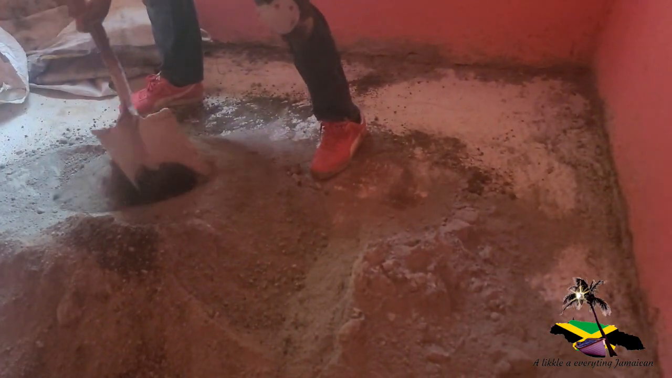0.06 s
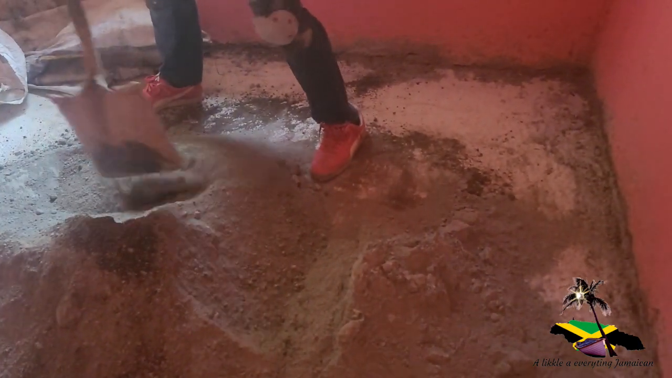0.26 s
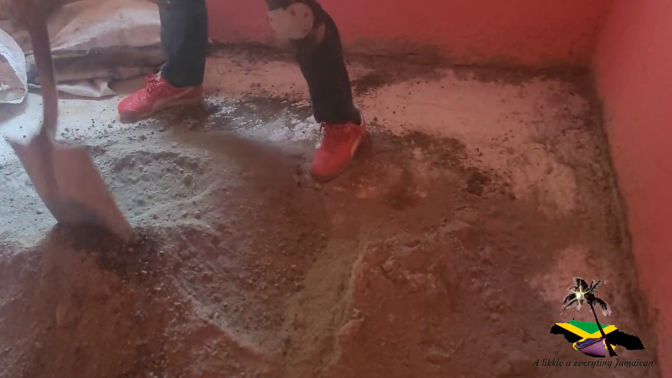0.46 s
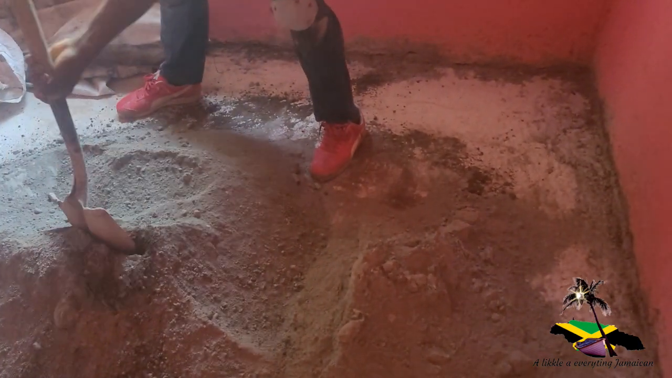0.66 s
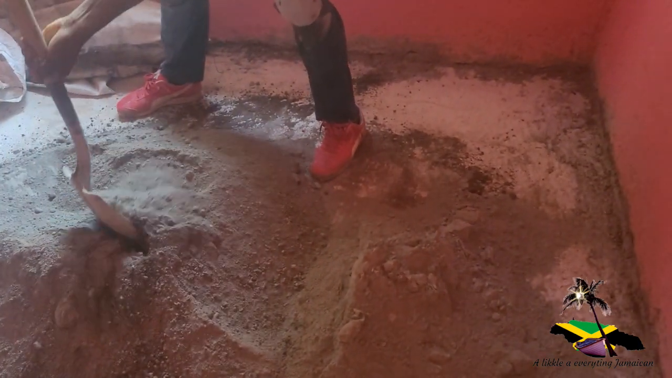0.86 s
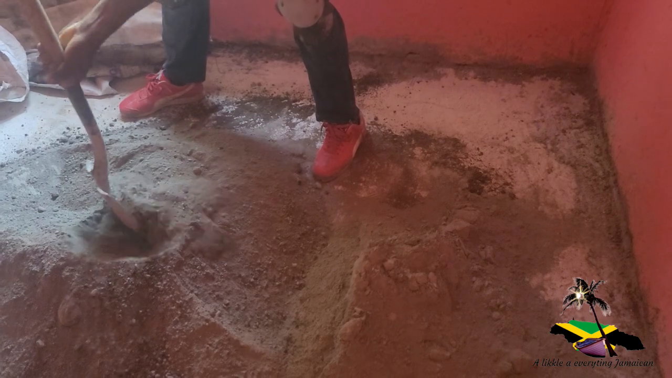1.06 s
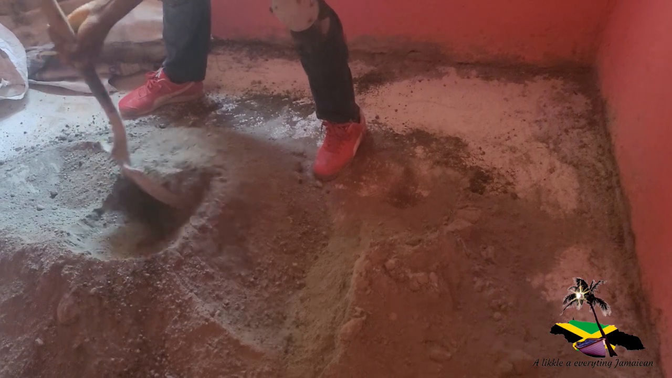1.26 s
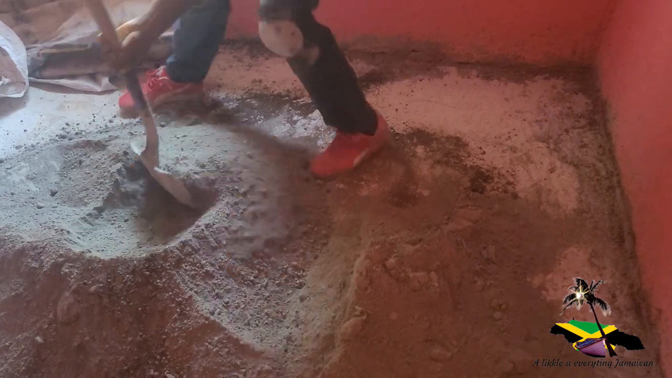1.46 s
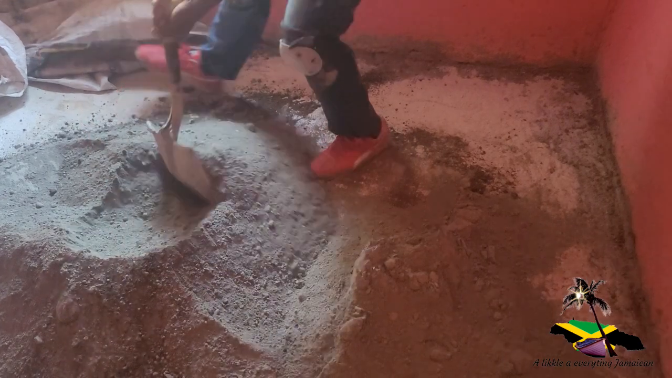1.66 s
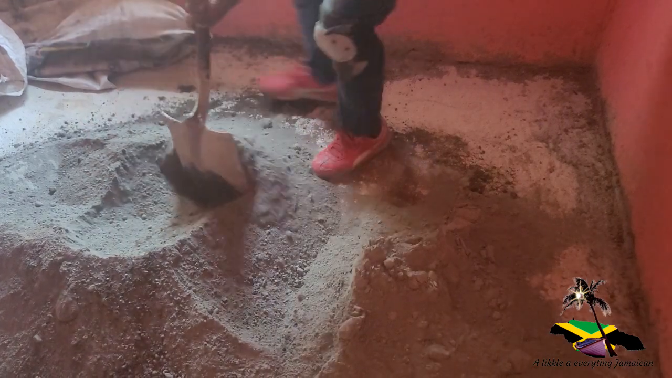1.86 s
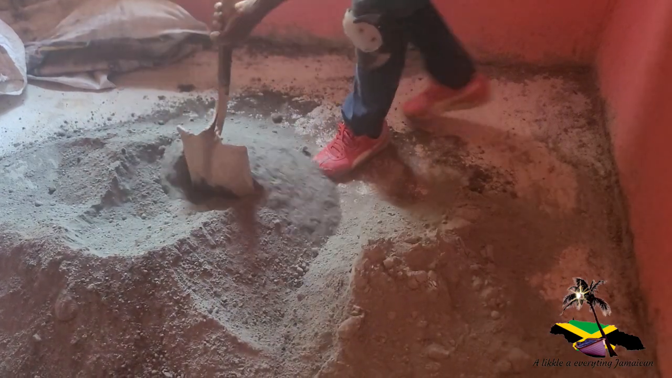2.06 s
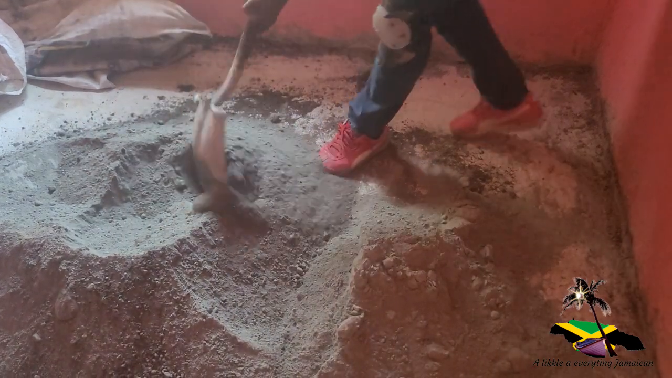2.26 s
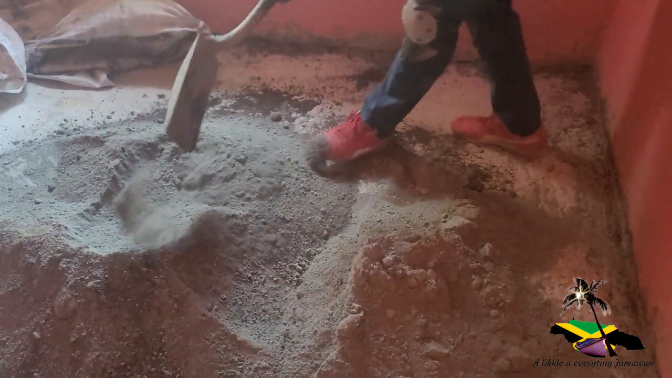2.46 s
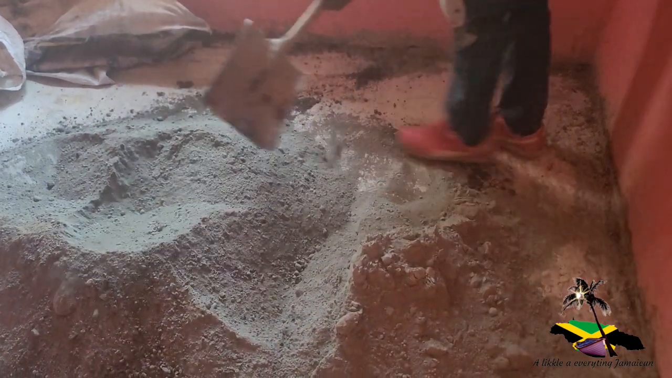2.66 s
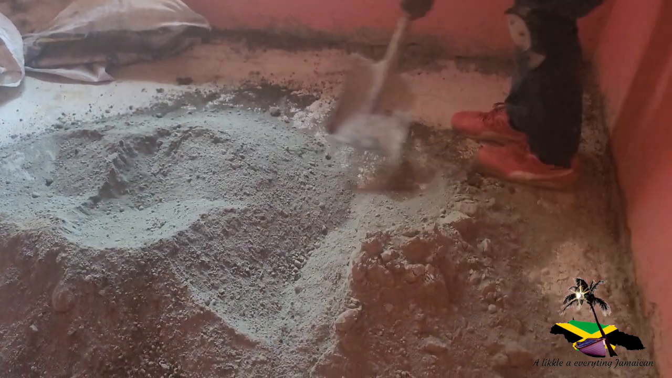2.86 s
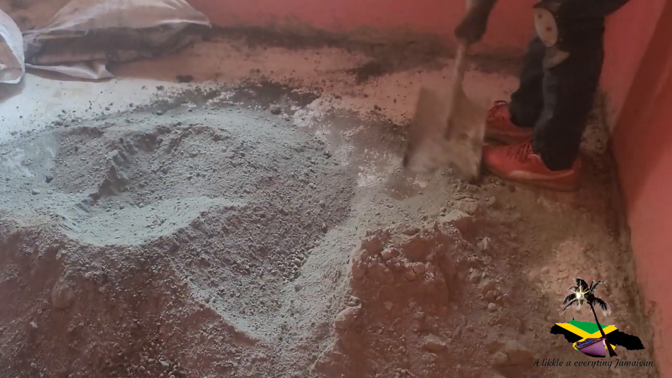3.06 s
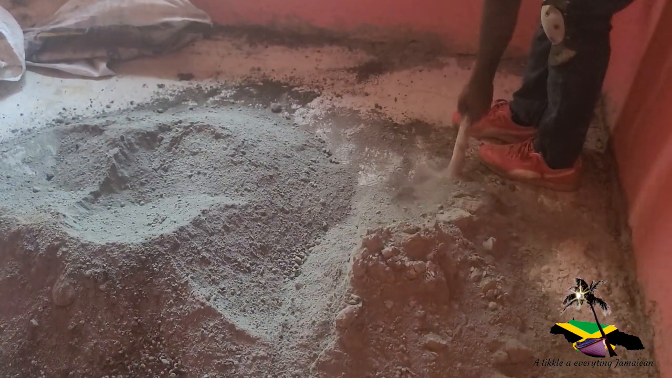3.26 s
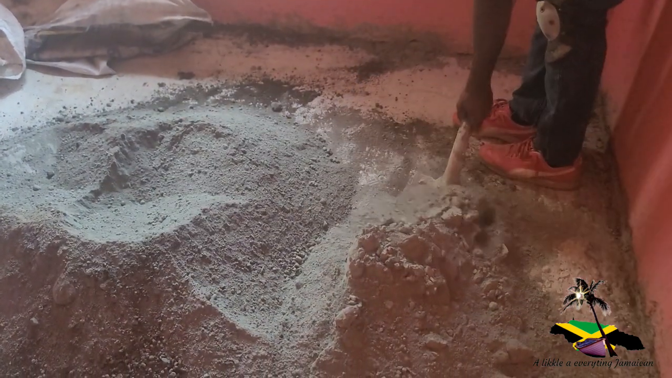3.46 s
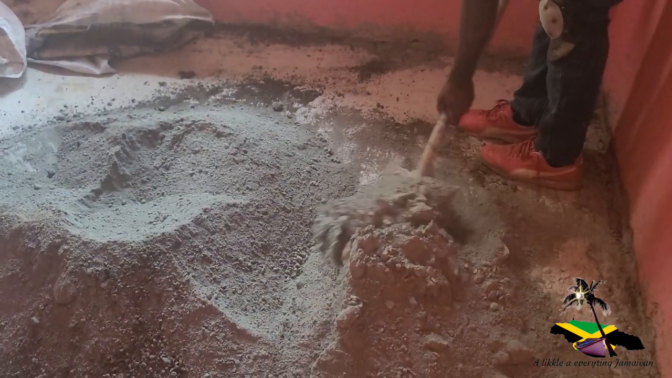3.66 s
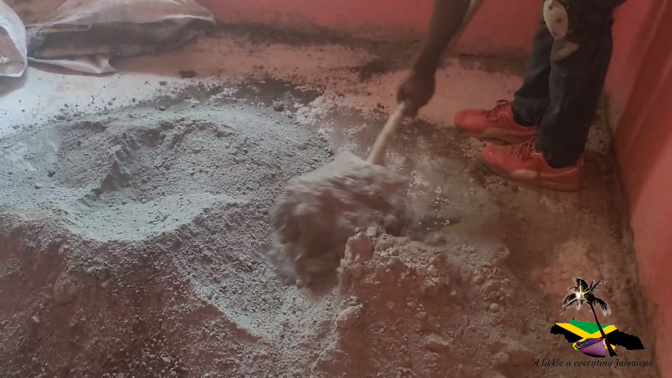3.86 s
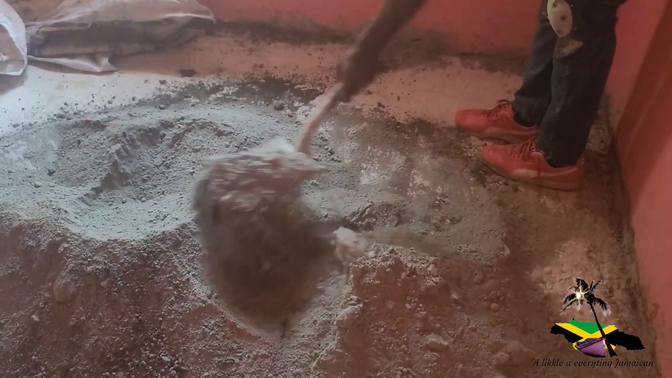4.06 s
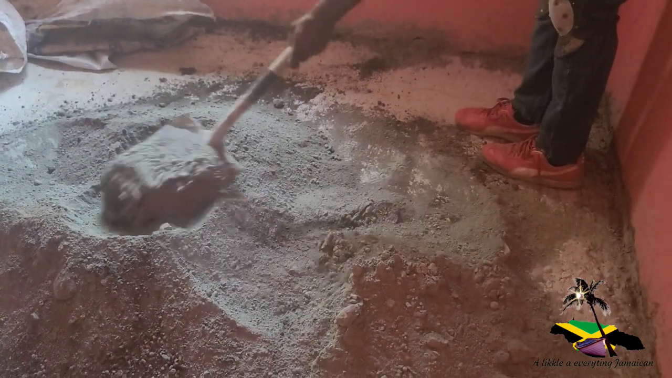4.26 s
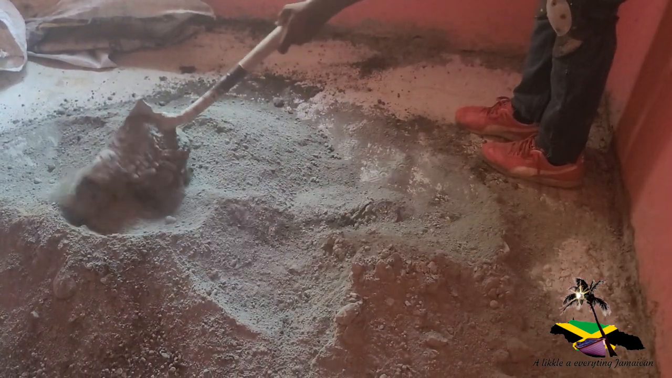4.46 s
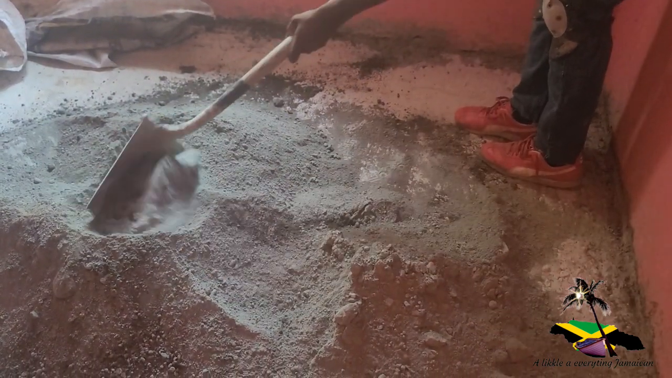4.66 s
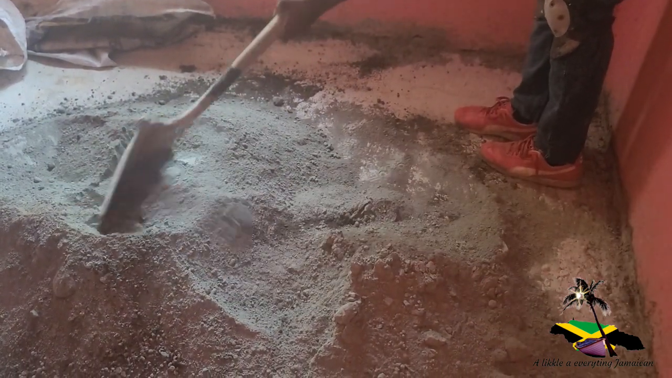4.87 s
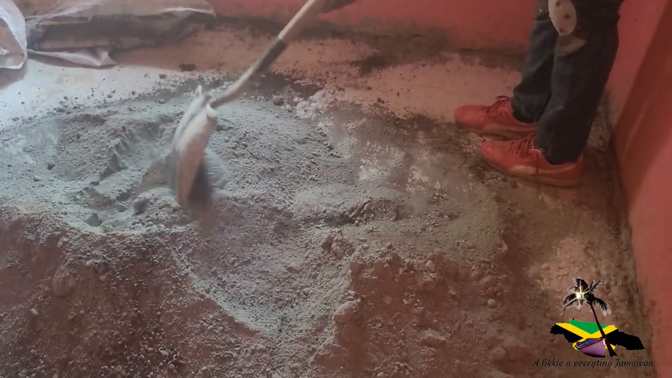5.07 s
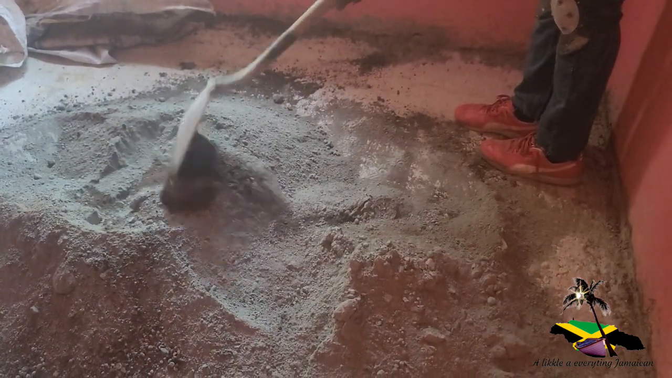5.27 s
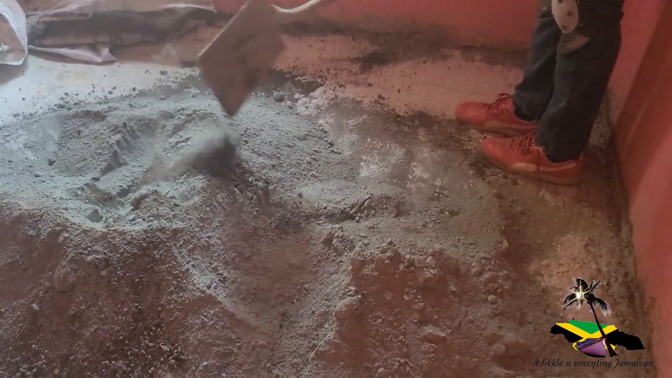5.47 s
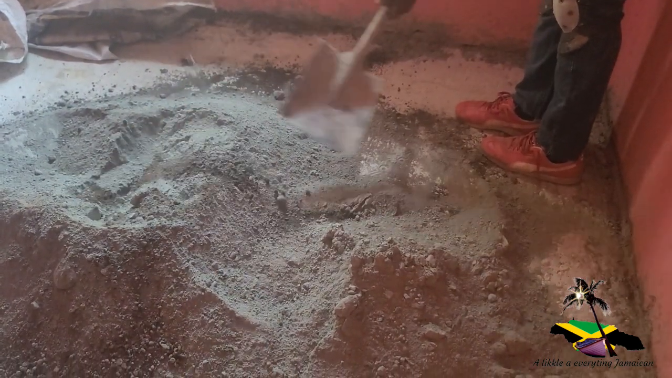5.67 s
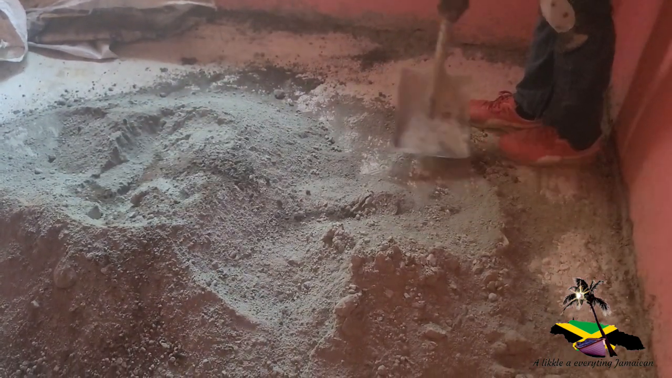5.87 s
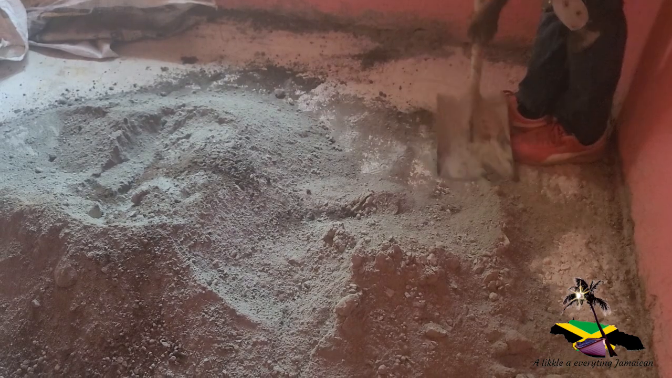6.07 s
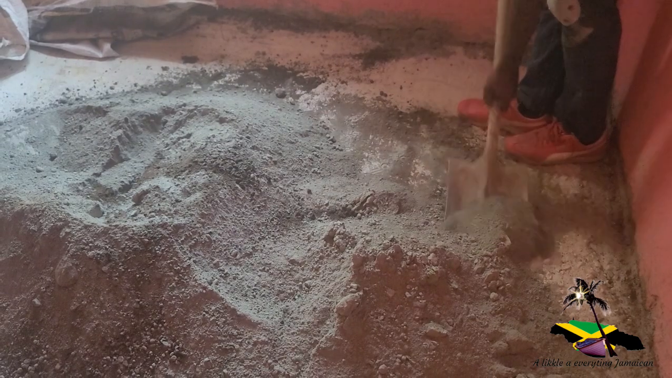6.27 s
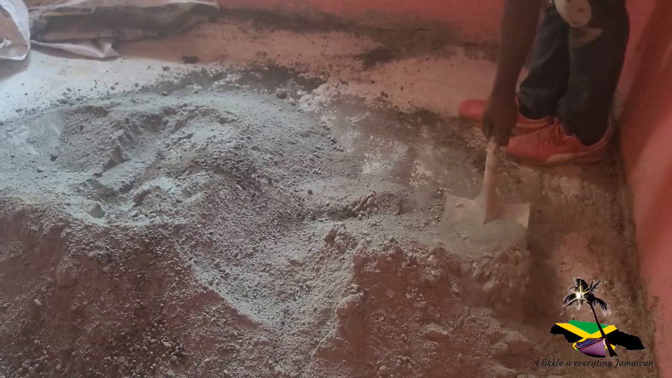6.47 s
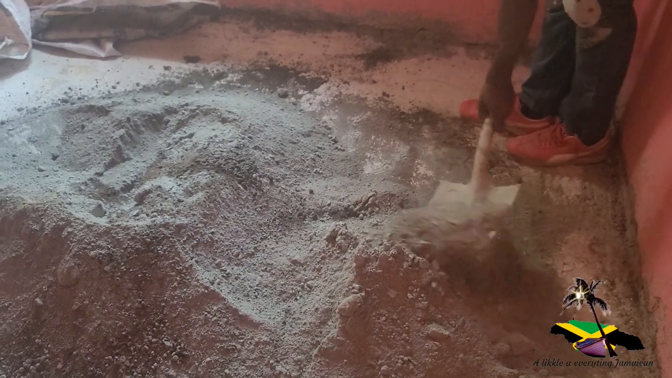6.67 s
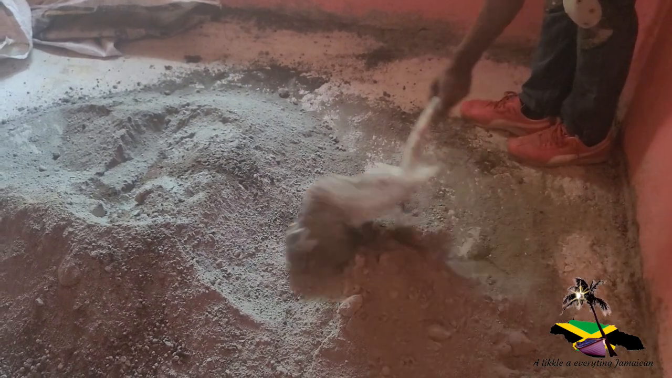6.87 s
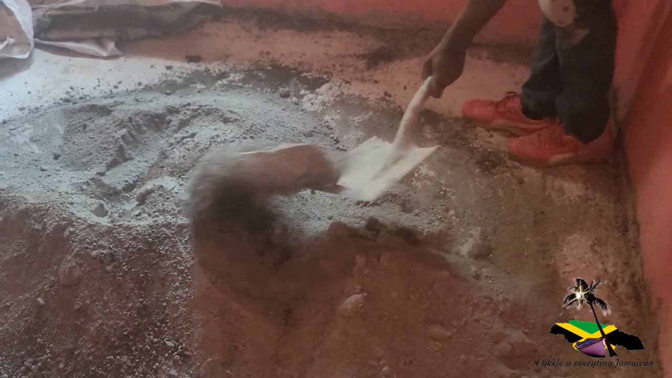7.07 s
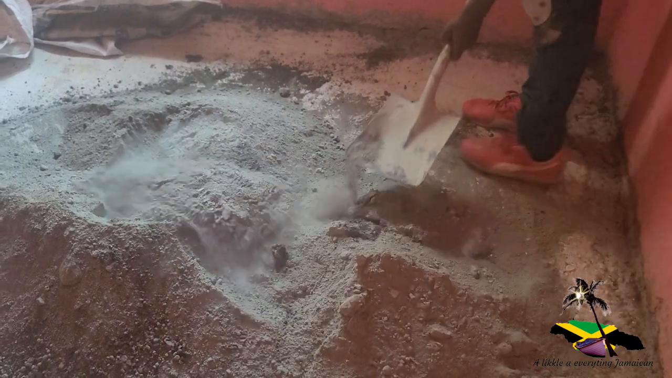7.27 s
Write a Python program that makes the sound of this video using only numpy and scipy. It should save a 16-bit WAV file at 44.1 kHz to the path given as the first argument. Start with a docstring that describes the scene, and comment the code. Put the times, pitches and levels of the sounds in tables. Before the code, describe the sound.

A shovel blade works a gritty heap on a concrete floor: brief hissing, crunching stabs, pebble ticks and muffled thuds. Midway it bites the floor with a loud metallic scrape, a load slides off softly, the blade drags and smooths, then a skipping double rasp rings out and sand patters down. Close stereo pickup in an echoing bare room, with a faint distant low drone and whine behind.

```python
"""A small bare room, close to a steel shovel that turns over sand and cement on a concrete floor.
Three hard strokes rasp the blade over the concrete: random grains of impact, coloured and sent through its modes.
Between them noise and grains make the cuts, a free drag and sliding loads; noise bursts make thuds and ticks.
Chattering tones sing from the edge. Standing waves and shifting stereo echoes give the ring of the walls.
Behind it lie filtered outdoor air, a low distant drone that sinks, and a faint whine."""
import sys
import numpy as np
from scipy import signal
from scipy.fft import rfft, irfft, next_fast_len
from scipy.io import wavfile
from scipy.ndimage import uniform_filter1d, map_coordinates

SR = 44100
rng = np.random.default_rng(int(sys.argv[2]) if len(sys.argv) > 2 else 0)


def to_wav(s):
    """Save 16-bit WAV."""
    ch = np.atleast_2d(s).T  # columns
    pcm = np.round(np.clip(ch, -1, 1) * 32767)  # PCM
    wavfile.write(sys.argv[1], SR, pcm.astype(np.int16))


N = 322354

# spectrum of fine sand, moved or falling: (frequency [Hz], relative level per hertz [dB])
FINE_SAND = [(40, -14), (170, -17), (600, -8.5), (2000, -5.5), (4500, -4.5), (6600, 2), (8600, -8),
             (11500, -11.5), (16000, -28.5)]


def amp(db):
    """Decibels to gain."""
    return 10 ** (np.asarray(db) / 20)


def unit(x):
    """Scale to rms 1."""
    return x / np.sqrt(np.mean(x ** 2) + 1e-20)


def along(points, hz):
    """Read a curve of (Hz, value) points on a log frequency axis."""
    point_hz, values = np.transpose(points)
    return np.interp(np.log(hz + 1), np.log(point_hz + 1), values)


def wobble(rate, size=N):
    """A smooth random curve, rate knots a second."""
    knots = rng.standard_normal(int(size * rate / SR) + 4)
    return map_coordinates(knots, [np.arange(size) * rate / SR])


def filtered(x, response):
    """Filter x by a complex response of frequency."""
    n = x.shape[-1]
    padded = next_fast_len(n + SR // 2)
    spectrum = rfft(x, padded) * response(np.fft.rfftfreq(padded, 1 / SR))
    return irfft(spectrum, padded)[..., :n]


def resonances(modes, f):
    """Causal response of damped modes, given as (Hz, width Hz, peak dB)."""
    return sum(amp(db) * 1j * f * width / (hz * hz - f * f + 1j * f * width) for hz, width, db in modes)


def coloured(x, spectrum):
    """Weight x by the given spectrum and bring it to rms 1."""
    return unit(filtered(x, lambda f: amp(along(spectrum, f))))


def add(track, s, sound):
    """Mix a sound into the track at time s."""
    part = track[max(round(s * SR), 0):][:len(sound)]
    part += sound[:len(part)]


def scrape():
    """The edge sticks and slips: every slip shakes the shovel, rasps the steel, crushes grit and cracks stones."""
    # spectra of crushed grit, steel rasp and shaking shovel: (frequency [Hz], relative level per hertz [dB])
    grit_spectrum = [(300, -54), (2000, -2), (3500, -1), (5200, 0.5), (6600, 6), (8600, -3.5), (11500, -5),
                     (16000, -22)]
    rasp_spectrum = [(150, -21.5), (450, 0), (800, -1.5), (1300, 5), (2800, 2.5), (4500, -11), (12000, -37)]
    judder_spectrum = [(25, -26), (60, -13), (125, -6), (220, 0), (450, -4), (780, -4), (1200, -11),
                       (4000, -49.5)]
    stones_db = -7  # against the rasp
    grit, rasp, judder = stroke_gains()
    slip = amp(3.8 * np.minimum(wobble(130), 2) + 2.8 * np.minimum(wobble(55), 1))
    crushed = patchy(slip * grains(3500, spread_db=7.5), patch_db=3.5)
    crushed = coloured(crushed, grit_spectrum)
    steel = through_blade(patchy(slip * grains(2500, spread_db=6), patch_db=4.0))
    steel = coloured(steel, rasp_spectrum)
    shaking = coloured(slip * grains(700, spread_db=4.0), judder_spectrum)
    cracking = amp(stones_db) * stones(130, spread_db=0)
    return grit * crushed + rasp * (steel + cracking) + judder * shaking


def stroke_gains():
    """Grit, rasp and judder follow the same stroke; the growing load shifts the sound from bright to low."""
    # hard strokes of the edge over the concrete, the last of which skips and bites again; levels before the room:
    # (start [s], rise [s], hold [s], release [dB/s], crushed grit [dB], steel rasp [dB], judder [dB])
    strokes = [(0.439, 0.05, 0.079, 389, -21.5, -26.5, -45.5),
               (3.045, 0.018, 0.15, 213.5, -13.5, -14, -26.5),
               (5.991, 0.052, 0.037, 215, -17.5, -13.5, -28.5),
               (6.121, .035, 0.079, 121, -17.5, -16.5, -23)]
    # as the blade fills, grit and rasp are muffled and the shovel judders more [dB/s of hold]
    grit_drift, rasp_drift, judder_drift = -18, -41, 47.5
    grit, rasp, judder = np.zeros((3, N))
    for s, rise, hold, release, grit_db, rasp_db, judder_db in strokes:
        add(grit, s, amp(grit_db) * movement(rise, hold, release, grit_drift))
        add(rasp, s, amp(rasp_db) * movement(rise, hold, release, rasp_drift))
        add(judder, s, amp(judder_db) * movement(rise, hold, release, judder_drift))
    return grit, rasp, judder


def movement(rise, hold, release_db_per_s, drift_db_per_s=0):
    """Gain of one movement of the shovel: it eases in, holds with a steady drift and dies away."""
    longest_s = 1.5
    t = np.arange(int(longest_s * SR)) / SR
    attack = np.sin(np.pi / 2 * np.minimum(t / rise, 1)) ** 2
    held = np.clip(t - rise, 0, hold)
    released = np.maximum(t - rise - hold, 0)
    return attack * amp(drift_db_per_s * held - release_db_per_s * released)


def grains(rate, spread_db):
    """Random tiny impacts, rate a second, of log-normal size; sizes are capped, so no single one stands far out."""
    hit = rng.random(N) < rate / SR
    direction = np.sign(rng.standard_normal(N))
    return hit * direction * amp(spread_db * np.minimum(rng.standard_normal(N), 2))


def patchy(x, patch_db):
    """Bands swell and fade at random as the contact wanders along the edge."""
    z = signal.stft(x, nperseg=512)[2]
    field = uniform_filter1d(rng.standard_normal(z.shape), size=3, axis=0)  # over frequency
    field = uniform_filter1d(field, size=7, axis=1)  # over time
    return signal.istft(z * amp(patch_db * unit(field)), nperseg=512)[1][:N]


def through_blade(x):
    """Contacts are heard directly and through the blade's modes, which shift as the load and the grip change."""
    # modes of the blade at rest, before the bend: (frequency [Hz], width [Hz], level [dB])
    blade_modes = [(396, 74, 4), (635, 71, 4.5), (693, 32, 7), (764, 19, -2.5), (1160, 99, 1),
                   (1670, 230, 5), (1945, 60, 2.5), (2790, 460, 2)]
    bend = .025  # largest shift as a share of frequency, either way
    slack = filtered(x, lambda f: 1 + resonances(blade_modes, f * (1 + bend)))
    tense = filtered(x, lambda f: 1 + resonances(blade_modes, f * (1 - bend)))
    share = .5 + .5 * np.tanh(2 * wobble(13))
    return share * tense + (1 - share) * slack


def stones(rate, spread_db):
    """Small stones crack under the edge, each at its own pitch, and die in a few cycles; rms 1."""
    middle_hz, spread_oct = 1780, 0.71
    cycles_to_die = 6  # cycles for a fall of 60 dB
    sizes = grains(rate, spread_db)
    at = np.flatnonzero(sizes)[:, None]
    hz = middle_hz * 2 ** (spread_oct * np.clip(rng.standard_normal(N), -2, 2))[at]
    k = np.arange(SR // 50)  # samples of one crack
    cycles = hz * k / SR
    ringing = np.sin(2 * np.pi * cycles) * amp(-60 * cycles / cycles_to_die)
    cracks = sizes[at] * np.sqrt(hz) * ringing
    return unit(np.bincount((at + k).ravel(), cracks.ravel(), N)[:N])


def sand():
    """As the blade cuts, fine sand hisses over it while coarser grains and stones crunch against it in clumps."""
    # the blade cuts into or smooths the heap; levels before the room:
    # (start [s], rise [s], hold [s], fine sand [dB], coarse grains [dB])
    cuts = [(.095, 0.054, 0.016, -38, -43), (.28, 0.0065, 0.057, -86.5, -56.5),
            (.87, 0.092, 0.022, -37, -43.5), (1.245, 0.083, 0.0068, -31, -33),
            (1.35, 0.034, 0.14, -47, -38.5), (1.62, 0.028, 0.0091, -36.5, -38.5),
            (1.74, 0.032, 0.16, -49.5, -49.5), (1.88, 0.074, 0.0089, -33, -41.5),
            (2.11, 0.036, 0.19, -44.5, -44), (2.475, 0.0087, 0.027, -42.5, -36.5),
            (2.75, 0.0068, 0.036, -42.5, -33), (2.87, 0.02, .03, -46.5, -49.5),
            (4.585, 0.12, 0.0083, -34, -40), (4.795, 0.074, 0.1, -36, -39),
            (5.025, 0.07, 0.018, -26.5, -35), (5.18, 0.037, 0.028, -33.5, -39),
            (5.74, 0.014, 0.05, -58.5, -50.5), (6.625, 0.019, 0.011, -52.5, -75)]
    # spectrum of coarse grains: (frequency [Hz], relative level per hertz [dB])
    coarse_spectrum = [(40, -11), (220, -8.5), (600, -2.5), (1000, -2.5), (2000, 2), (3100, -0.5),
                       (12000, -40)]
    stones_db = -7.5  # against the crunch
    fine, coarse = sand_gains(cuts, 327.5)  # release [dB/s]: a cut stops with the blade
    clumps = amp(2.2 * wobble(70))
    hiss = coloured(clumps * grains(12000, spread_db=2.5), FINE_SAND)
    crunch = through_blade(patchy(clumps * grains(1500, spread_db=9.5), patch_db=3.5))
    crunch = coloured(crunch, coarse_spectrum)
    cracking = amp(stones_db) * stones(110, spread_db=4)
    return fine * hiss + coarse * (crunch + cracking)


def sand_gains(events, release_db_per_s):
    """Each cut or pour moves fine sand and coarse grains together."""
    fine, coarse = np.zeros((2, N))
    for s, rise, hold, fine_db, coarse_db in events:
        flow = movement(rise, hold, release_db_per_s)
        add(fine, s, amp(fine_db) * flow)
        add(coarse, s, amp(coarse_db) * flow)
    return fine, coarse


def squeals():
    """The edge catches and one mode of the shovel sings: a brief sine of unsteady pitch and strength."""
    # squeals, levels before the room and the wavering:
    # (start [s], length [s], middle pitch [Hz], level [dB], glide [share of the pitch])
    squeal_events = [(0.452, 0.049, 3690, -31, 0), (3.049, 0.13, 1923, -23.5, 0.017),
                     (3.1, 0.21, 295, -23.5, -0.0046), (5.745, 0.085, 693, -50.5, -.2),
                     (6.01, 0.047, 669, -24, -0.095), (6.062, 0.019, 4777, -17, -0.13),
                     (6.056, 0.051, 687, -14, -0.028), (6.161, 0.14, 770, -25, -.06),
                     (6.204, 0.074, 217, -22, 0), (7.045, 0.033, 1567, -47, 0)]
    track = np.zeros(N)
    for s, length, hz, db, glide in squeal_events:
        size = max(int(length * SR), 16)
        pitch = hz * (1 + glide * np.linspace(-.5, .5, size) + .03 * wobble(250, size=size))
        swell = np.sqrt(2 * np.hanning(size)) * amp(2.4 * wobble(120, size=size))
        add(track, s, amp(db) * swell * np.sin(2 * np.pi * np.cumsum(pitch) / SR))
    return track


def drag():
    """The empty blade is drawn edgewise through the heap: grains tap it and only its own modes answer."""
    free_modes = [(630, 120, -1.0), (1518, 31, -4.5), (1896, 96, 2)]  # Hz, width Hz, dB, for one pass of two
    level = np.zeros(N)
    add(level, 4.8, amp(-43) * movement(rise=0.051, hold=0.33, release_db_per_s=125.5))
    ringing = filtered(grains(2000, spread_db=4.5), lambda f: resonances(free_modes, f) ** 2)
    return level * unit(ringing)


def pours():
    """Falling sand hisses and patters softly on the heap, without any ring of steel."""
    # loose sand slides off the blade and settles; levels before the room:
    # (start [s], rise [s], hold [s], fine sand [dB], coarse grains [dB])
    slides = [(1.1, 0.1, .1, -58.5, -58), (2.6, 0.073, 0.14, -54.5, -52.5), (3.62, 0.02, 0.016, -51.5, -74),
              (3.88, 0.34, 0.42, -55.5, -58), (4.17, 0.013, 0.0091, -64.5, -56),
              (4.29, 0.03, 0.011, -78, -59.5), (5.465, 0.021, 0.012, -52.5, -57),
              (6.85, 0.11, 0.098, -53, -52), (7.12, 0.032, 0.0089, -56, -46)]
    # spectrum of coarse grains on the heap: (frequency [Hz], relative level per hertz [dB])
    patter_spectrum = [(40, -6), (300, -3.5), (1000, -3), (3500, -5.5), (12000, -32)]
    fine, coarse = sand_gains(slides, 95.5)  # release [dB/s]: a pour trickles out
    hiss = coloured(rng.standard_normal(N), FINE_SAND)
    patter = coloured(grains(2500, spread_db=6.5), patter_spectrum)
    return fine * hiss + coarse * patter


def thuds():
    """Dull thuds of feet and blade, each a broad puff of noise around one pitch."""
    # footfalls, pats and blunt blows of the blade, levels before the room:
    # (time [s], level [dB], centre [Hz], rise constant [s], fall by 60 dB [s])
    thud_events = [(.6, -46, 74.6, 0.017, 0.27), (0.93, -39.5, 390, 0.064, 0.2), (1.06, -52, 80, .01, 0.16),
                   (1.306, -33, 377, 0.015, 0.12), (1.665, -35, 402, 0.003, 0.12),
                   (1.75, -37.5, 416, 0.012, 0.38), (1.786, -32.5, 85, 0.0032, 0.16),
                   (2.277, -33, 267, 0.0035, 0.059), (2.525, -34.5, 284, 0.0073, 0.11),
                   (2.757, -23.5, 430, 0.004, 0.088), (2.763, -29.5, 179, 0.0035, 0.15),
                   (3.056, -13.5, 530, 0.0012, 0.25), (3.47, -36, 192, 0.01, 0.21),
                   (3.659, -47.5, 196, 0.02, 0.67), (5.752, -50.5, 330, .008, .2),
                   (5.881, -45.5, 171, 0.0053, 0.14), (6.545, -40.5, 215.5, 0.0012, 0.25),
                   (7.151, -46.5, 320, .03, 0.29)]
    track = np.zeros(N)
    for s, db, hz, rise, t60 in thud_events:
        add(track, s, amp(db) * burst(hz, 0.87, rise, t60))
    return track


def ticks():
    """Sharp ticks of pebbles that snap against the steel, each a noise burst with an almost instant rise."""
    # pebble snaps, levels before the room: (time [s], level [dB], centre [Hz], fall by 60 dB [s])
    snap_events = [(0.295, -40.5, 1660, 0.032), (.401, -43, 2240, 0.054), (.451, -32, 3700, .04),
                   (1.329, -28.5, 1190, 0.029), (1.454, -20.5, 1900, 0.037), (1.581, -32, 1520, 0.04),
                   (1.593, -35, 2200, 0.11), (1.959, -25, 3600, 0.02), (2.491, -34, 2600, 0.02),
                   (2.788, -21.5, 1100, 0.011), (2.887, -35, 4560, 0.033), (3.057, -13, 2100, 0.032),
                   (3.152, -16, 1390, 0.018), (5.886, -44, 6050, 0.031), (6.014, -26.5, 1680, .05),
                   (6.044, -24, 10300, 0.055), (6.076, -15, 2730, 0.017), (6.223, -15.5, 6300, 0.042),
                   (6.272, -17, 1090, 0.028), (7.189, -42.5, 11040, 0.016)]
    track = np.zeros(N)
    for s, db, hz, t60 in snap_events:
        add(track, s, amp(db) * burst(hz, 1.0, 0.00048, t60))
    return track


def burst(hz, sharpness, rise, t60):
    """A puff of noise around hz that swells and dies."""
    t = np.arange(SR // 2) / SR
    noise = rng.standard_normal(len(t))
    noise = filtered(noise, lambda f: 1 / (1 + (sharpness * (f / hz - hz / (f + 1))) ** 2))
    shape = (1 - np.exp(-t / rise)) * amp(-60 * t / t60)
    return unit(noise) * shape / shape.max()


def room(x, direct_db, split_hz):
    """Direct sound, standing waves and echoes; short waves take a new path from every grain, long ones hardly change."""
    # standing waves between the walls: (frequency [Hz], width [Hz], level relative to the set as a whole [dB])
    standing_waves = [(111.9, 1.63, 12), (162.2, 5.5, 15), (216.7, 3.1, 5), (258, 6, -2.5), (302, 8.2, 5),
                      (415.1, 5.1, 10.5), (453, 4.6, 0.5)]
    standing_db = -4.5  # the set as a whole

    def long_share(f):
        return 1 / (1 + (f / split_hz) ** 6)

    near = filtered(x, lambda f: amp(direct_db) + resonances(standing_waves, f) * amp(standing_db))
    long_waves = filtered(x, lambda f: np.sqrt(long_share(f)))
    short_waves = filtered(x, lambda f: np.sqrt(1 - long_share(f)))
    return near + echoes(long_waves, rate=3, count=3) + echoes(short_waves, rate=150, count=7)


def echoes(x, rate, count):
    """The echo pattern changes rate times a second as the point of contact shifts, cycling through count tails."""
    place = np.arange(N) / SR * rate
    heard = np.zeros((2, N))
    for k in range(count):
        distance = abs((place - k + count / 2) % count - count / 2)
        share = np.cos(np.pi / 2 * np.minimum(distance, 1))  # crossfade between neighbouring tails
        heard += signal.oaconvolve((x * share)[None], tail(), axes=1)[:, :N]
    return heard


def tail():
    """A diffuse stereo echo off the bare walls; the treble dies first."""
    # reverberation: (frequency [Hz], fall by 60 dB [s])
    fall_times = [(100, 0.74), (300, 0.65), (800, 0.58), (2500, 0.49), (6000, 0.43), (13000, 0.3)]
    # strength of the echo: (frequency [Hz], level [dB])
    tail_levels = [(100, -4), (350, -2.5), (700, -1), (14000, -3)]
    hz, t, z = signal.stft(rng.standard_normal((2, SR * 3 // 4)), SR, nperseg=256)
    decay = amp(-60 * t / along(fall_times, hz)[:, None]) * (t > 0)
    energy = np.sum(decay ** 2, axis=1, keepdims=True) * t[1] * SR
    decay *= amp(along(tail_levels, hz))[:, None] / np.sqrt(energy)
    return pair(signal.istft(z * decay, SR, nperseg=256)[1])


def pair(noise):
    """Two unrelated noises become left and right: alike in the bass, nearly unrelated in the treble."""
    # left-right likeness: (frequency [Hz], correlation [-1 to 1])
    likeness = [(130, 0.82), (300, 0.89), (640, 0.55), (1300, -0.17), (6000, -0.14)]

    def mid_side(f):
        angle = np.arccos(np.clip(along(likeness, f), -1, 1)) / 2
        return np.array([np.cos(angle), np.sin(angle)])

    mid, side = filtered(noise, mid_side)
    return np.array([mid + side, mid - side])


def background():
    """Quiet outdoor air as coloured stereo noise, and a distant engine as a low unsteady sine that sinks."""
    # spectrum of the air: (frequency [Hz], relative level per hertz [dB])
    air_spectrum = [(25, -1.5), (60, -5.5), (100, -9), (250, -6), (700, -7.5), (1050, -9), (1500, -7),
                    (4000, -22), (16000, -33.5)]
    # the engine's level, before its wavering: (time [s], level [dB])
    drone_levels = [(0, -55.5), (1.2, -58), (3.5, -68.5)]
    air = amp(-59.0) * coloured(pair(rng.standard_normal((2, N))), air_spectrum)
    drone_hz = 52.0 * (1 + 0.016 * wobble(2.6))
    drone = np.sqrt(2) * np.sin(2 * np.pi * np.cumsum(drone_hz) / SR)
    s, db = np.transpose(drone_levels)
    level = amp(np.interp(np.arange(N) / SR, s, db))
    return air + level * amp(1.2 * wobble(12.0)) * drone


def whine():
    """A faint, fuzzy tone from far off hangs in the air outside: noise passed twice through one resonance."""
    resonance = [(1018.6, 45, 0)]  # Hz, width Hz of one pass, dB
    narrow = filtered(rng.standard_normal((2, N)), lambda f: resonances(resonance, f) ** 2)
    return amp(-66) * unit(narrow)


def scene():
    """All the work sounds in the same room, with the air, drone and whine behind them."""
    snaps = ticks()
    work = scrape() + squeals() + sand() + pours() + drag() + thuds() + snaps
    # the blade also throws the snaps straight at the microphone
    thrown = amp(-12.5) * snaps
    return room(work, direct_db=-9.5, split_hz=1370) + thrown + background() + whine()


def record(dry):
    """The left microphone is mostly duller than the right; the highest peaks are rounded off, the band is limited."""
    # balance of the microphones: (frequency [Hz], left minus right [dB])
    left_right = [(100, -2), (700, -2), (1300, -1), (2400, -0.5), (4400, -7.5), (8100, 0.5), (11500, -10.5)]
    top_hz = 16000
    heard = filtered(dry, lambda f: amp(np.outer([.5, -.5], along(left_right, f))))
    rounded = heard / (1 + abs(heard / .95) ** 6) ** (1 / 6)
    return filtered(rounded, lambda f: f < top_hz)


dry = scene()
out = record(dry)
to_wav(out)
```